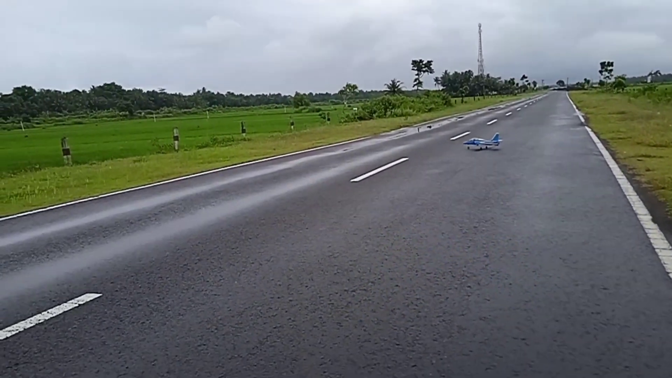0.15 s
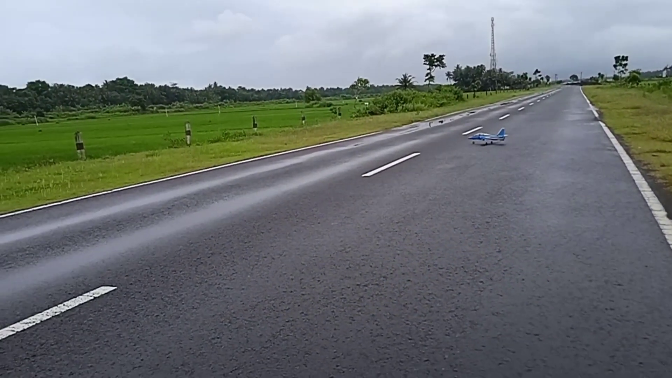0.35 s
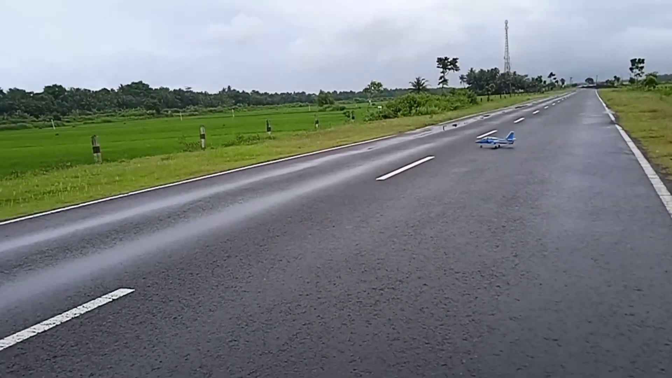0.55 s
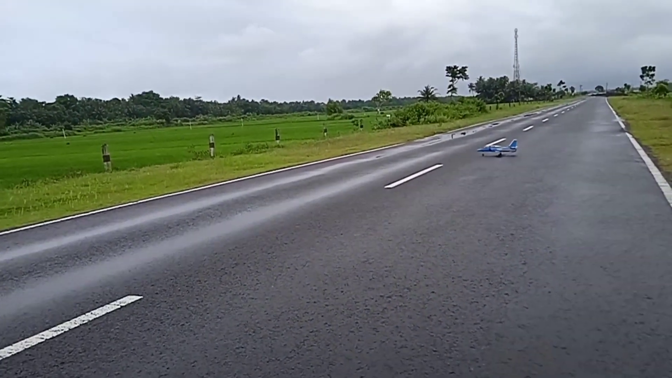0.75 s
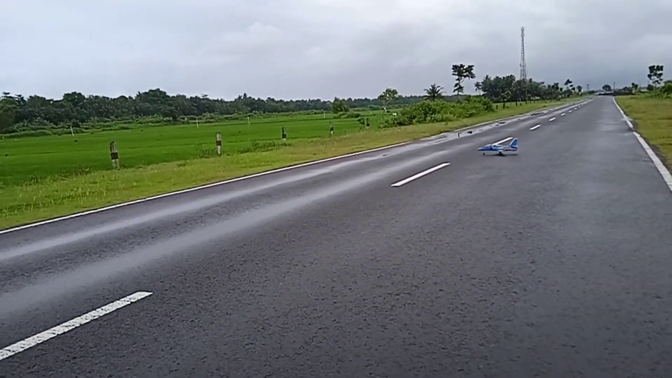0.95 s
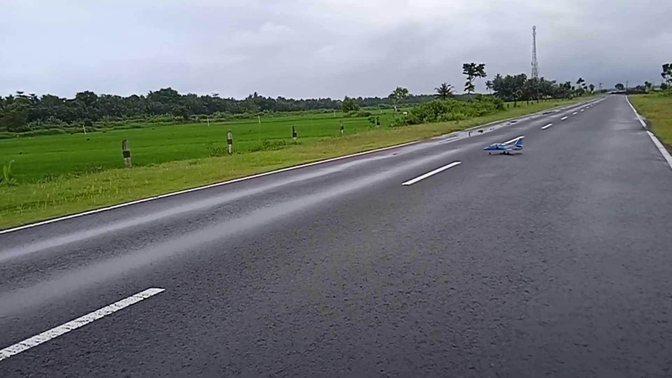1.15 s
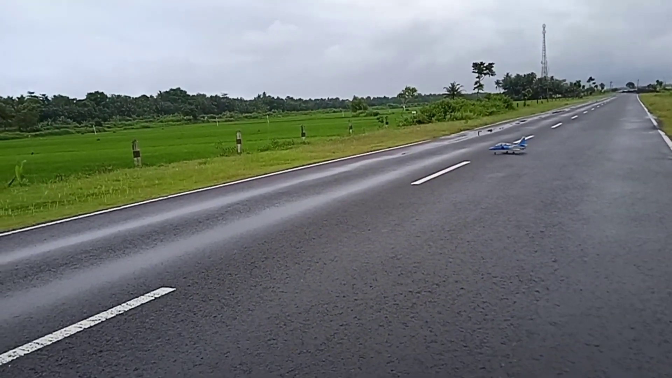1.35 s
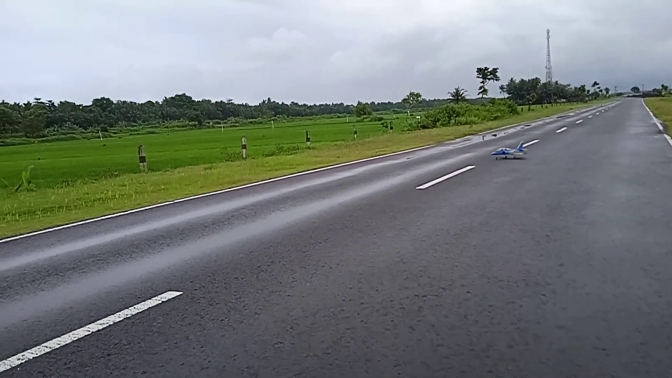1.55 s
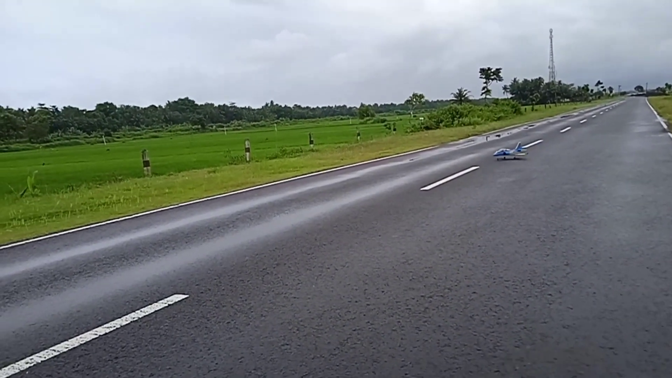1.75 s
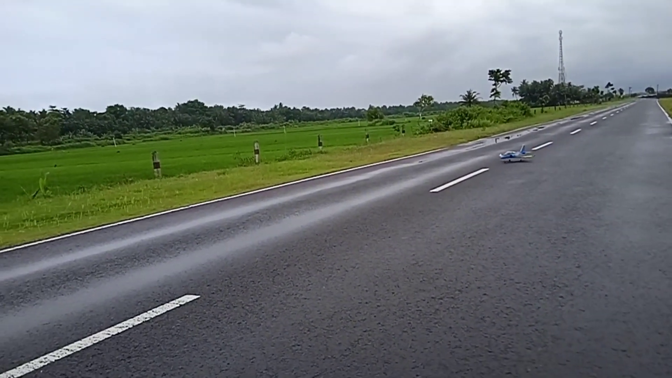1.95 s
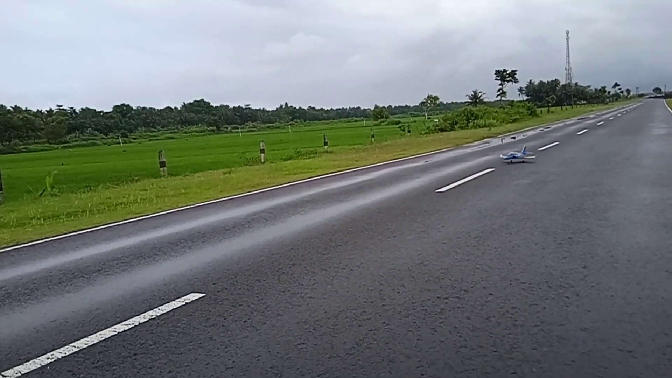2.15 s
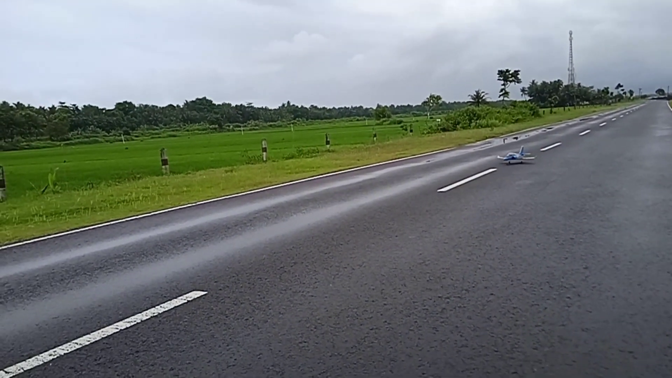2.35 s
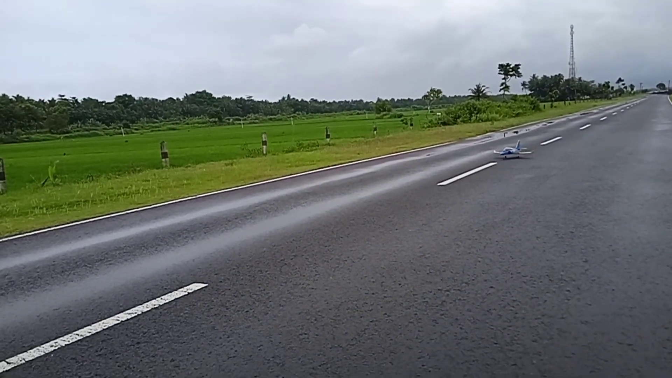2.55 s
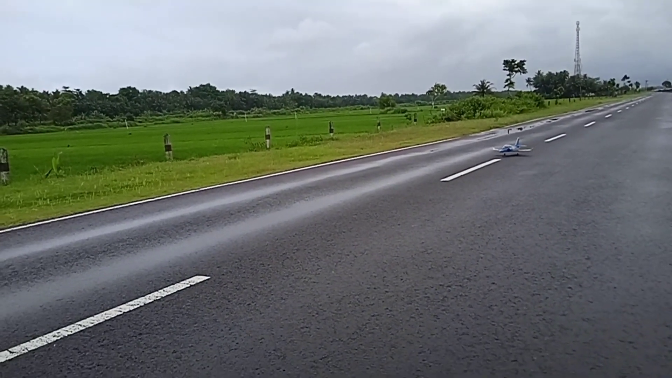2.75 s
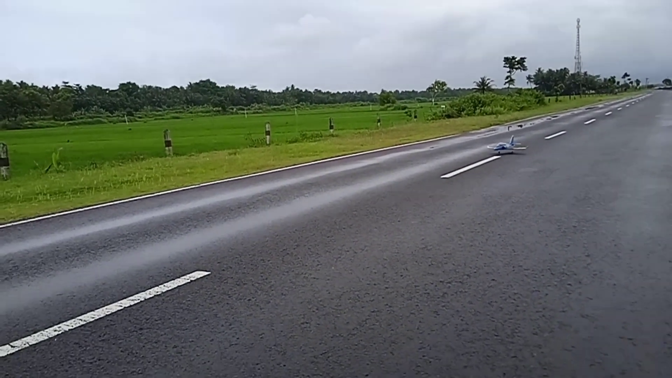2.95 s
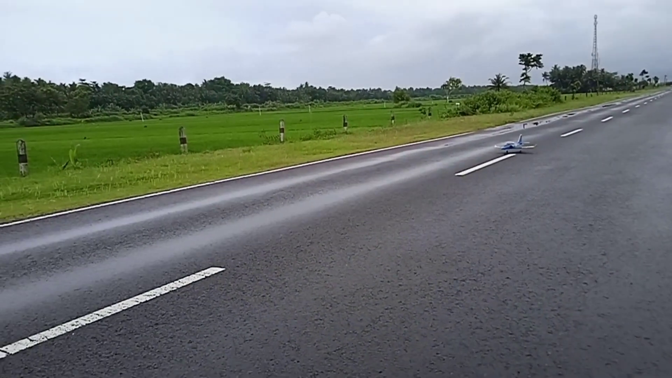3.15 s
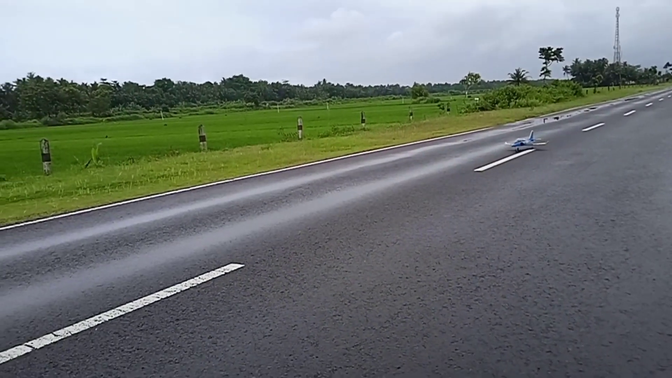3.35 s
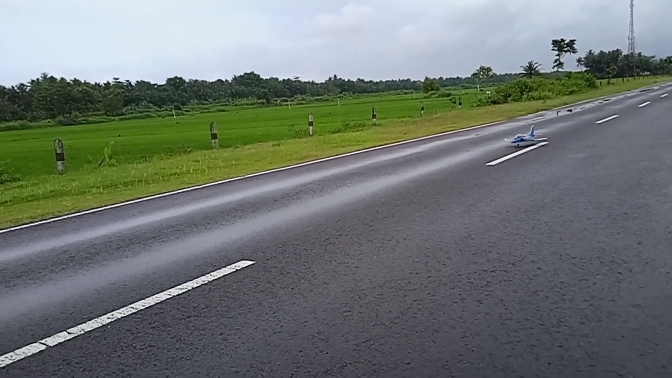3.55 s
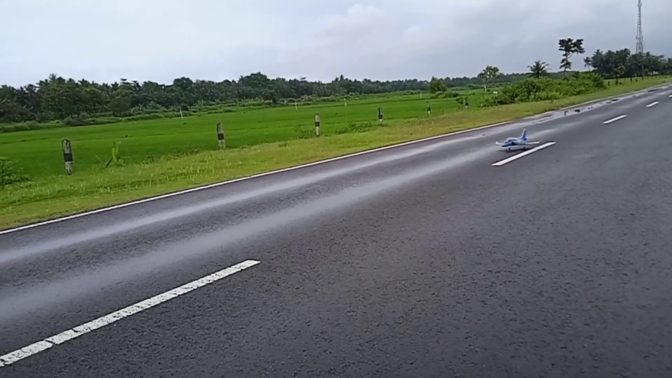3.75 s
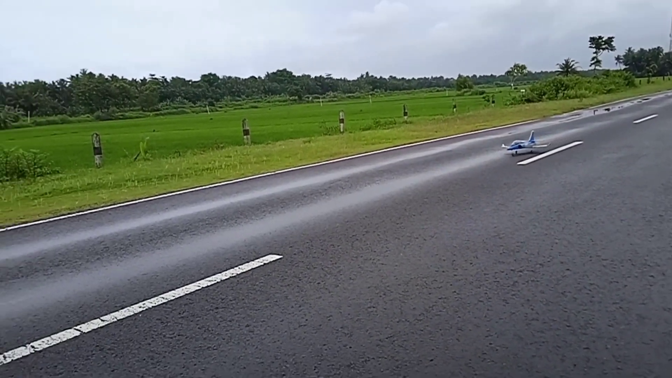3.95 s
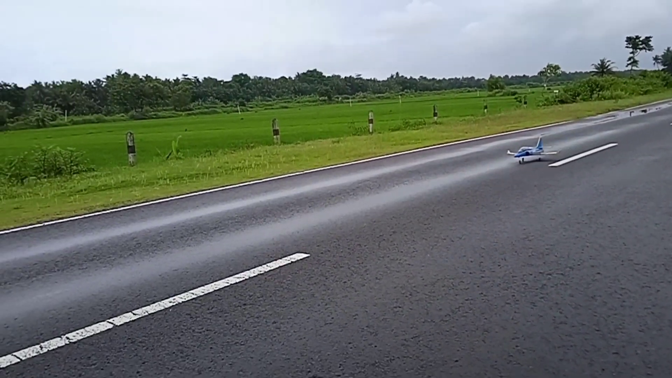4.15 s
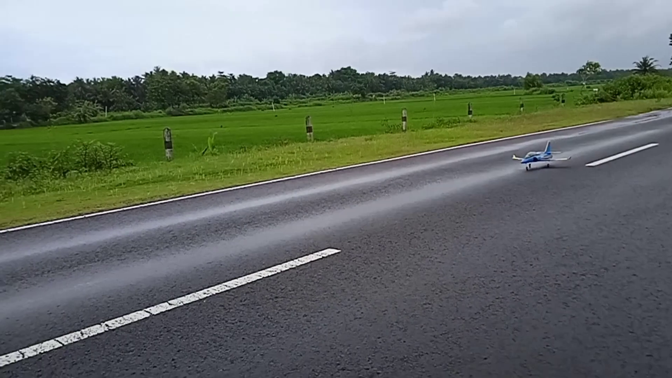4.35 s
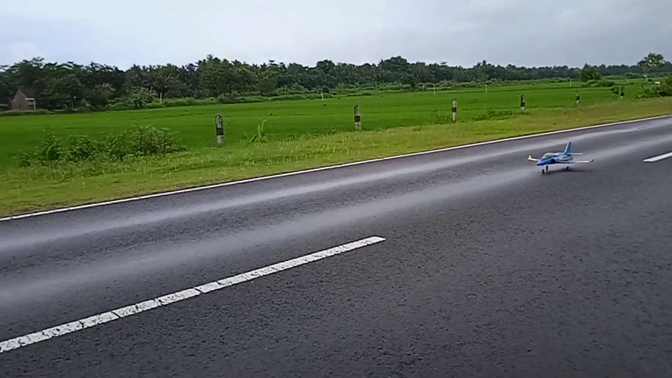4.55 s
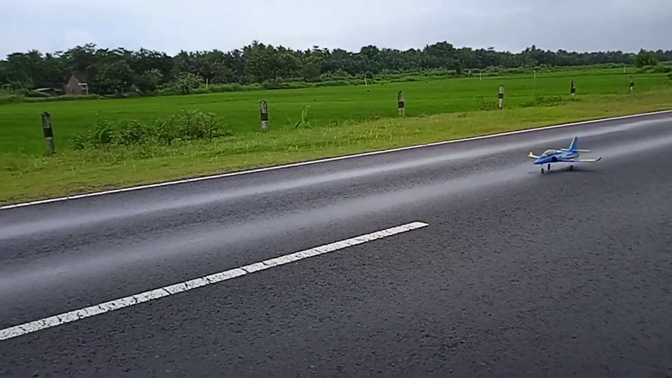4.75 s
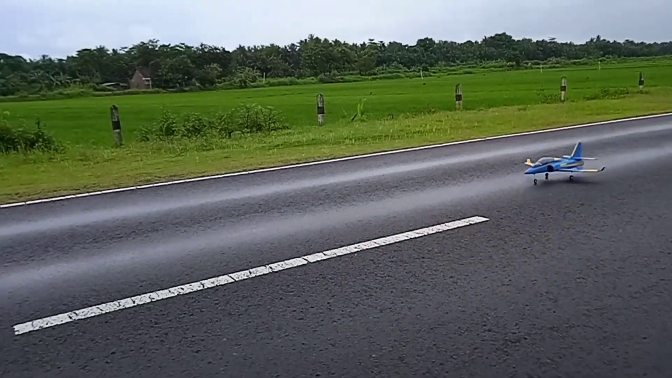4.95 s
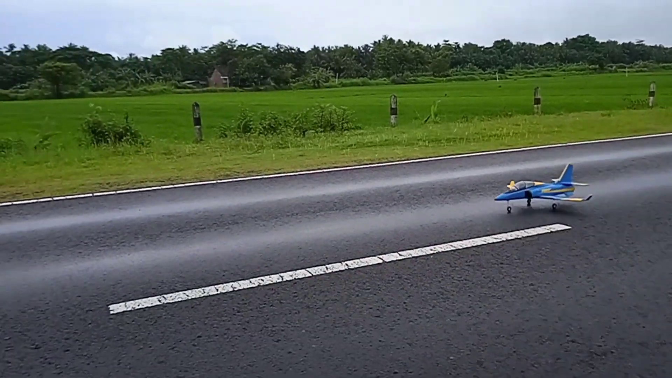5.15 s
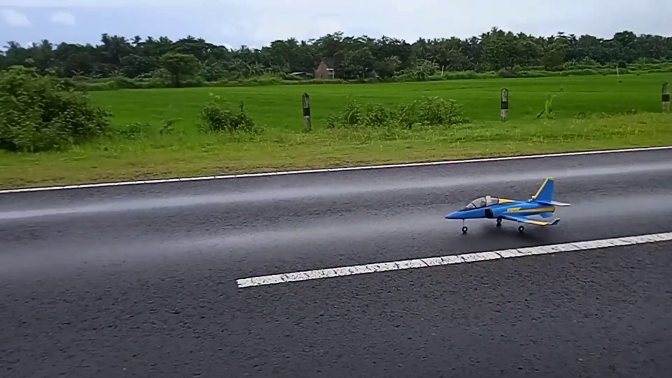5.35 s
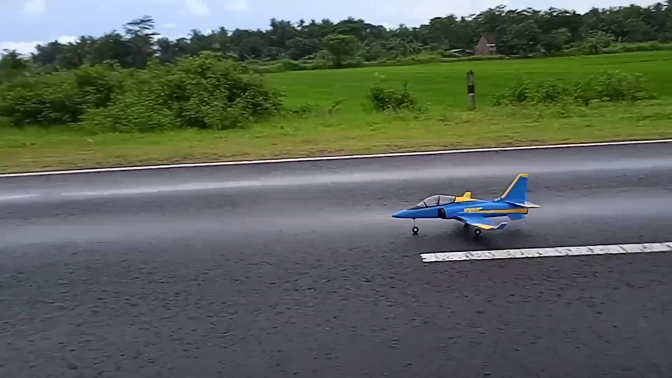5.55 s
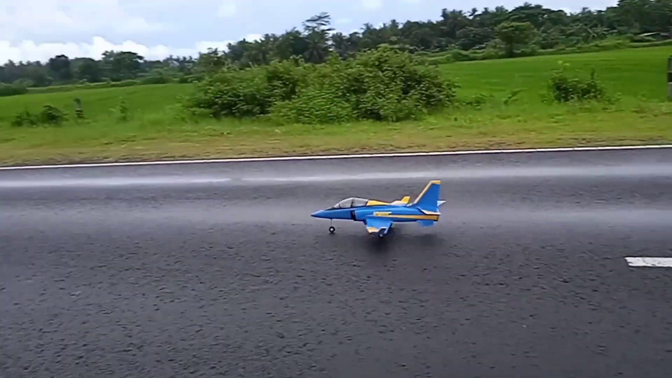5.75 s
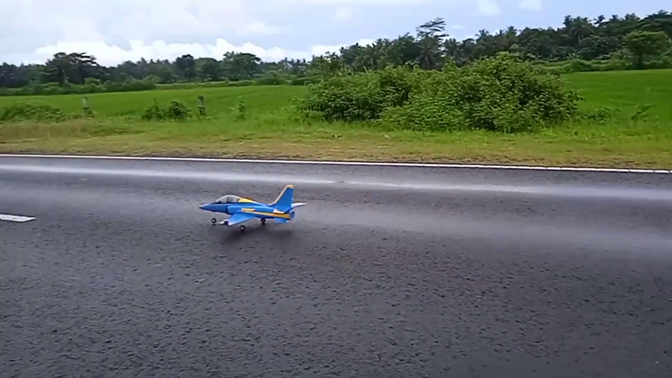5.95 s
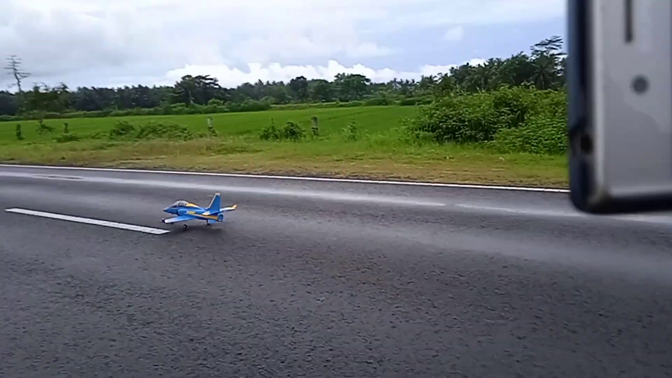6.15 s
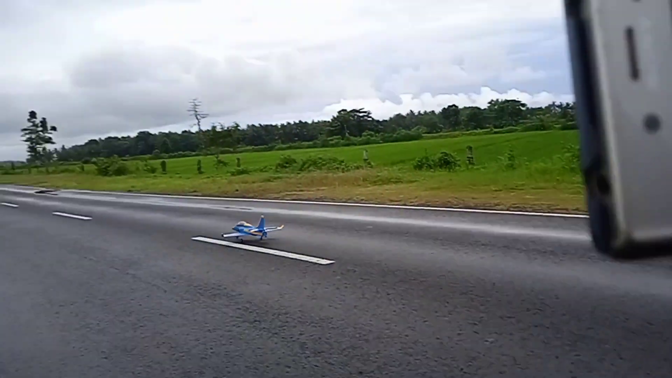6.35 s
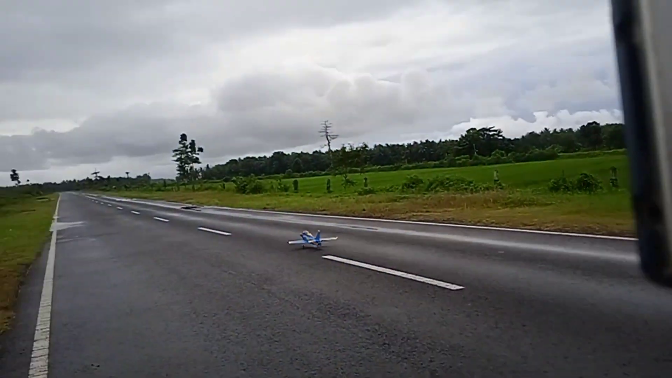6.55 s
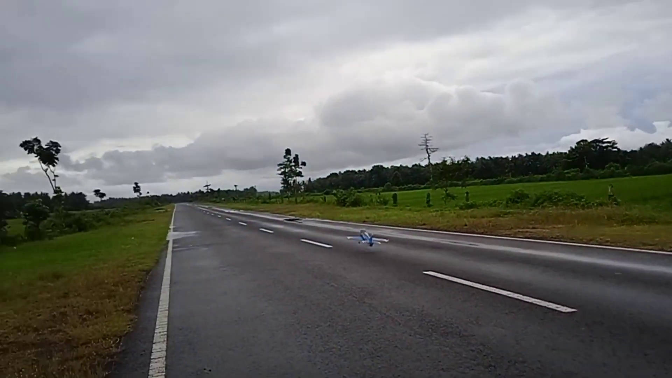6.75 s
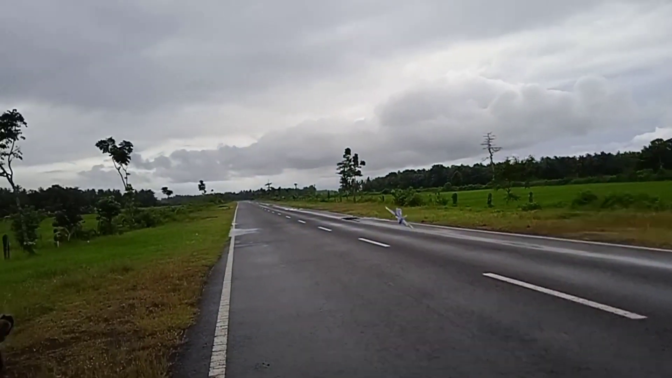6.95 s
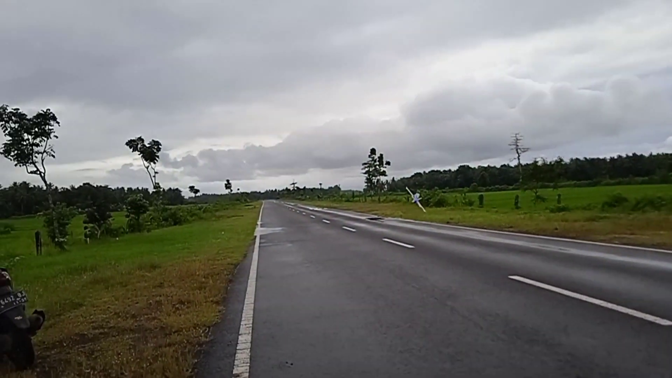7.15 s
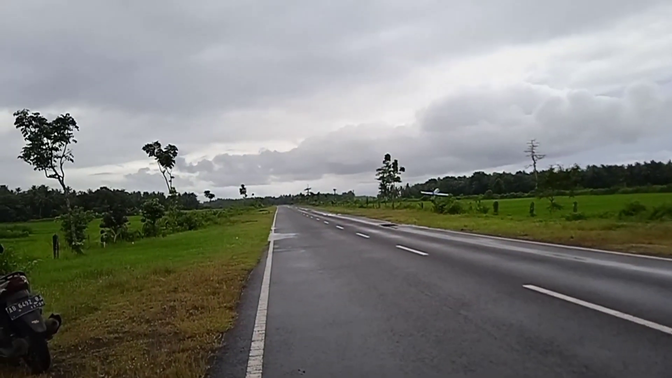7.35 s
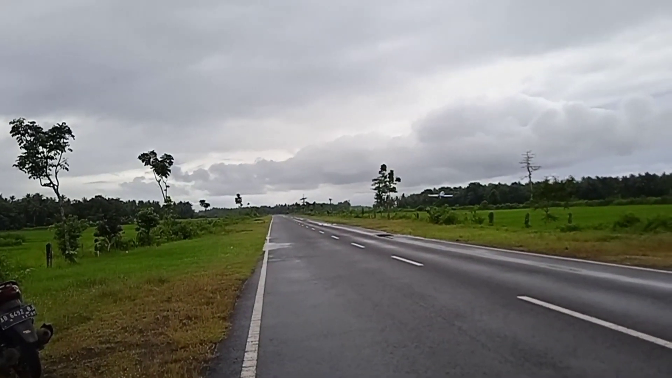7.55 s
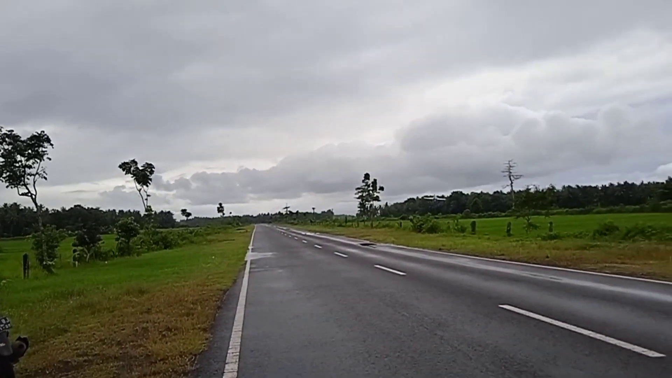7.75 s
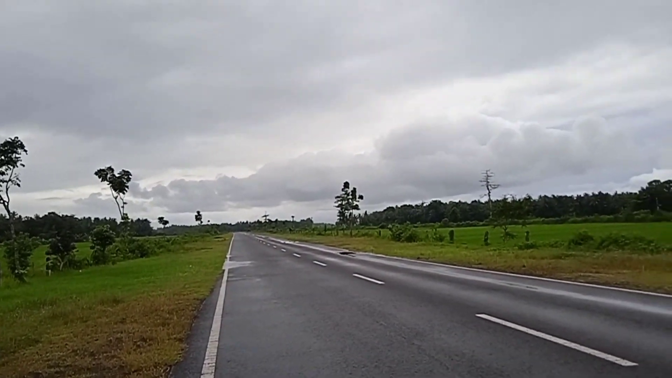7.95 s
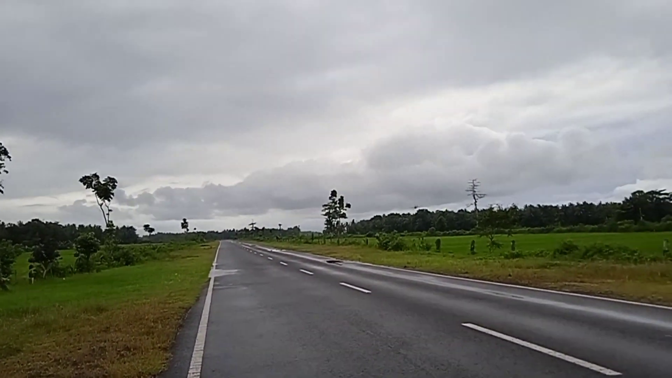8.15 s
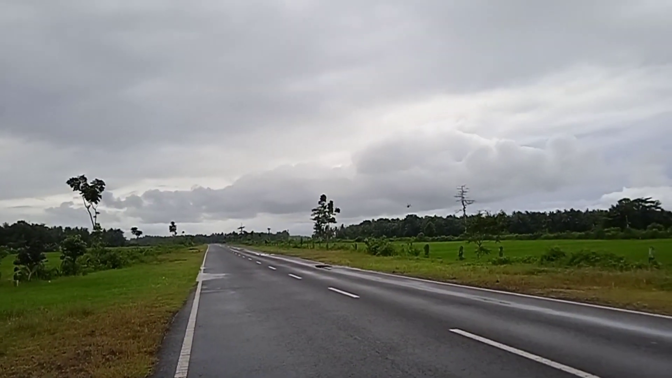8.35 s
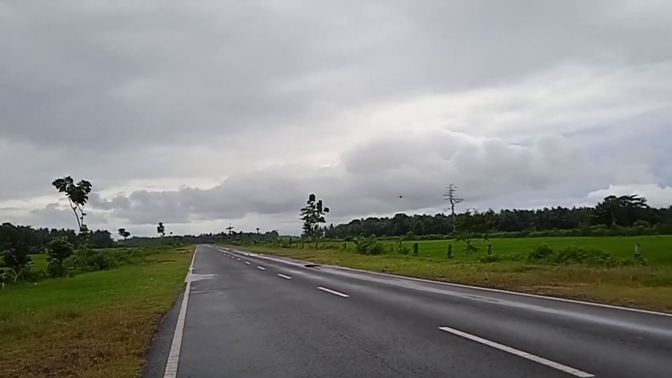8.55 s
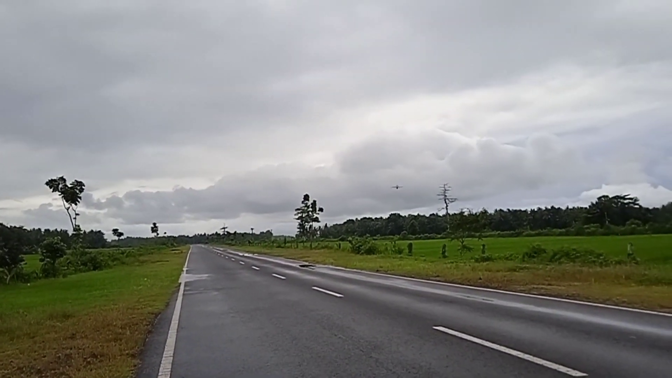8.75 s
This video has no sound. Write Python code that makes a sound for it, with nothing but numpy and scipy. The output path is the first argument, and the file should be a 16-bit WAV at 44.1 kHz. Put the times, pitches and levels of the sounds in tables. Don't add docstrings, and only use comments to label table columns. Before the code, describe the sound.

Outdoors on an open country road, a handheld microphone picks up finger ticks, soft hiss, light wind and a far bird peeping. A small electric ducted fan spools up in steps, its thin whine growing into bright whine and roar. It rushes past a few metres away with a little wheel drumming, drops in pitch, then a sharp knock hits the microphone's case. The jet lifts off and fades into airy hiss.

```python
import sys
import numpy as np
from scipy import signal
from scipy.io import wavfile
from scipy.ndimage import uniform_filter1d, map_coordinates

SR = 44100
rng = np.random.default_rng(int(sys.argv[2]) if len(sys.argv) > 2 else 0)


def how_loud(loudness_db):
    steps = np.asarray(loudness_db, float) / 20
    return 10 ** steps


def wrap_up_sound(samples):
    columns = np.atleast_2d(samples).T
    tamed = np.clip(columns, -1, 1)
    steps = np.round(tamed * 32767).astype(np.int16)
    wavfile.write(sys.argv[1], SR, steps)


N = 388080
TIME = np.arange(N) / SR
SOUND_M_PER_S = 343
BLADES = 11


def evened(x):
    return x / np.sqrt(np.mean(x ** 2) + 1e-20)


def curve(rows):
    s, *columns = np.transpose(rows)
    return [np.interp(TIME, s, column) for column in columns]


def add(mix, s, sound):
    part = mix[round(s * SR):][:len(sound)]
    part += sound[:len(part)]


def drift(rate_hz):
    span = max(int(SR / rate_hz / 2), 1)
    return evened(uniform_filter1d(uniform_filter1d(rng.standard_normal(N), span), span))


def resonate(x, hz, *widths_hz):
    turn = np.exp(2j * np.pi * np.cumsum(hz * np.ones(len(x))) / SR)
    for width_hz in widths_hz:
        r = np.exp(-np.pi * width_hz / SR)
        x = 2 * (turn * signal.lfilter([1 - r], [1, -r], x / turn)).real
    return x


def noise(colour, patchy_db, size=512):
    frames, hz = 4 * N // size + 5, np.fft.rfftfreq(size, 1 / SR)
    f, level_db = np.transpose(colour)
    a, b, patches = rng.standard_normal((frames, len(hz), 3)).T
    patches = uniform_filter1d(patches, size=3, axis=0)
    patches = evened(uniform_filter1d(patches, size=40, axis=1))
    shape_db = np.interp(np.log(hz + 1), np.log(f), level_db, -90, -90)
    z = (a + 1j * b) * how_loud(shape_db[:, None] + patchy_db * patches)
    return evened(signal.istft(z, nperseg=size, noverlap=3 * size // 4)[1][:N])


def echoed(x, ms, strength, dull_hz):
    strength = np.clip(strength, -1, 1)
    low = signal.filtfilt(*signal.butter(1, dull_hz, fs=SR), x)
    delay = uniform_filter1d(ms, size=1000) * SR / 1000
    late = map_coordinates(low, [np.arange(N) - delay], order=1)
    return (x + strength * late) / np.sqrt(1 + strength ** 2)


def tone(turns, db, waver_db, rate_hz):
    level = np.sqrt(2) * how_loud(db + waver_db * drift(rate_hz))
    return level * np.sin(2 * np.pi * (turns + rng.random()))


# middle in seconds, rise time in seconds, change of shaft speed in Hz.
THROTTLE = [(0.099, 0.065, -26.0), (.41, 0.029, 65), (0.579, 0.052, 69.5), (0.724, 0.038, 17),
            (1.25, 0.068, -13), (1.611, 0.078, 21.0), (2.705, 0.027, 61), (2.8, 0.048, 33.5),
            (3.229, 0.081, 52.5), (3.426, 0.04, 45), (3.722, 0.028, 7.5), (3.971, 0.025, 54.5),
            (4.63, 0.026, 25.5), (4.758, 0.041, 64)]
IDLE_HZ = 307.6
PASS_S, LANE_M = 5.777, 5.63
PASS_M_PER_S, GAIN_M_PER_S2 = 10.09, 2.011


def flight():
    t = np.arange(0, N / SR + .01, .005)
    shaft = IDLE_HZ + sum(hz / (1 + np.exp((s - t) / rise)) for s, rise, hz in THROTTLE)
    speed = np.maximum(PASS_M_PER_S + GAIN_M_PER_S2 * (t - PASS_S), 0)
    along = (speed ** 2 - PASS_M_PER_S ** 2) / (2 * GAIN_M_PER_S2)
    metres = np.hypot(along, LANE_M)
    heard = shaft * (1 - speed * along / metres / SOUND_M_PER_S)
    return curve(np.transpose([t, shaft, heard, metres, along / metres]))


# time in seconds, loudness in dB, brightness in dB.
AIR = [(.3, -86, 12.5), (.89, -72.5, -3), (1.27, -75, -2), (2.05, -70.5, -0.5), (2.64, -72.5, 2.5),
       (2.81, -67, 0), (3.21, -64, -1.5), (3.5, -62.5, -1), (4.7, -57.5, -1), (4.85, -53.5, -1),
       (5.34, -50.5, -3.5), (5.51, -52, -2), (5.67, -46.5, -5.5), (6.1, -51, 5), (6.36, -55, 5),
       (6.9, -60.5, 6.5), (7.28, -62, 1.5), (8.8, -69, -4)]
# level in dB, share of loudness, share of brightness, gain from the front in dB,
# gain after the climb in dB.
LAYERS = [
    (-1.5, 1.01, 0.031, -0.6, -17),
    (-0.94, 1.01, 0.041, 0.5, 1),
    (-0.74, 0.96, 1.01, 0.4, 2.5),
    (-3, 1.37, 1.12, 2, 6),
    (-4, 0.93, 1.07, 2, 1),
]
PIVOT_DB = -58
LIFT_S, CLIMB_S = 6.92, 1.9


def air_db():
    (loud, bright), behind = curve(AIR), flight()[3]
    climbed = np.clip((TIME - LIFT_S) / CLIMB_S, 0, 1) ** 2
    return [PIVOT_DB + db + a * (loud - PIVOT_DB) + b * bright - front_db * behind + up_db * climbed
            for db, a, b, front_db, up_db in LAYERS]


# frequency in Hz, level in dB.
FIELD = [(250, -6.5), (500, -8.5), (900, -11.5), (1300, -15), (2500, -16), (4000, -19), (6500, -18),
         (7600, -21.5), (8600, -34), (9800, -27), (11000, -16.5), (12300, -36), (13800, -34), (15200, -21),
         (15900, -42)]


def field():
    return how_loud(-70.5) * noise(FIELD, 3.7, size=1024)


# time in seconds, level in dB.
WIND = [(0.0, -70), (0.71, -66), (2.28, -69.5), (4.21, -65.5), (5.64, -67.5), (6.84, -61.5), (6.98, -66.5),
        (8.8, -71)]
# frequency in Hz, level in dB.
WIND_COLOUR = [(20, -30), (40, -69), (65, -5), (100, -3.5), (150, -2.5), (220, -7.5), (330, -13.5),
               (500, -23.5)]
# start in seconds, peak in dB, frequency in Hz, length in seconds.
PUFFS = [(0.381, -56, 126, 0.039), (0.544, -50.5, 120, 0.032), (2.548, -57, 153, 0.041),
         (4.123, -43.5, 110, 0.032), (5.07, -44, 107.4, 0.036), (6.465, -40.5, 96.7, 0.031),
         (6.513, -45, 96.4, 0.038), (6.591, -41.5, 114.6, 0.032), (6.712, -39, 109, 0.032),
         (6.857, -40, 99, 0.028), (6.941, -44, 111, 0.035), (7.266, -56, 135.4, 0.033),
         (7.424, -42.5, 117, 0.026), (7.929, -47.5, 82, 0.032), (8.489, -56, 155, 0.043),
         (8.549, -52, 150, 0.056)]


def wind():
    out = how_loud(curve(WIND)[0] + 1.76 * drift(25)) * noise(WIND_COLOUR, 1.0, size=2048)
    for s, db, hz, length in PUFFS:
        t = np.arange(0, length, 1 / SR)
        add(out, s, how_loud(db - 4.5) * np.hanning(len(t)) * np.sin(2 * np.pi * hz * (t - length / 2)))
    return out


def far_hum():
    return how_loud(-75.5) * evened(resonate(rng.standard_normal(N), 154.6, 12))


# multiple of the whistle, plus multiple of the shaft, start in seconds,
# end in seconds, level in dB.
SIDEBANDS = [
    (1, -6, .22, 0.36, -82),
    (1, 12, .36, 0.58, -85),
    (2, -6, .53, .7, -89),
    (2, -6, 1.8, 2.75, -101),
]
WHISTLE_HZ, WHISTLE_HZ_PER_S, WHISTLE_END_S = 8004, 11, 4.3


def controller():
    heard = flight()[1]
    hz = WHISTLE_HZ + WHISTLE_HZ_PER_S * TIME
    out = tone(np.cumsum(hz) / SR, -83.5, 5, 9) * np.clip((WHISTLE_END_S - TIME) / 1.4, 0, 1)
    for whistles, shafts, start, end, side_db in SIDEBANDS:
        gate = np.clip(np.minimum(TIME - start, end - TIME) / .03, 0, 1)
        turns = np.cumsum(whistles * hz + shafts * heard) / SR
        out += gate * tone(turns, side_db, 2.1, 16)
    return out


def shaft_turns():
    return np.cumsum(flight()[1] * (1 + 0.000787 * drift(36.0))) / SR


# multiple of the shaft, idle level in dB, swell time in seconds, swell level in dB.
COGGING = [(1, -78, .41, -71), (1, -99, .46, -70), (1, -99, .52, -72), (2, -82, .42, -90),
           (3, -81, .42, -77), (4, -90, .45, -77), (4, -99, .51, -76), (5, -88, .495, -73),
           (6, -84, .38, -84), (7, -83, .43, -77)]


def cogging(turns):
    out = np.zeros(N)
    for k, idle_db, s, swell_db in COGGING:
        idle = how_loud(idle_db) * np.clip((.5 - TIME) / .15, 0, 1)
        swell = how_loud(swell_db) * np.exp(-((TIME - s) / .045) ** 2)
        out += (idle + swell) * tone(k * turns, -2, 3, 40)
    return out


# multiple of the shaft, level in dB against the duct noise.
FAINT = [(4, -31), (5, -27), (7, -31), (12, -21)]


def faint_shaft(turns):
    body_db, out = air_db()[1], np.zeros(N)
    for k, db in FAINT:
        standing_db = 4 * (TIME < 2.6)
        before_pass_db = -15 * (k > BLADES) * (TIME < PASS_CHANGE_S)
        out += tone(k * turns, body_db + db + standing_db + before_pass_db, 4, 12)
    return out


PASS_CHANGE_S = 5.75
# start in seconds, peak in dB, ring in Hz, width in Hz, t60 in seconds.
TICKS = [(.128, -57, 6000, 3000, .004), (.143, -62, 4500, 3000, .004), (0.1657, -51, 1900, 1500, 0.0055),
         (.1656, -54, 500, 1200, 0.006), (.1654, -58, 5000, 5000, .003), (0.193, -40, 3000, 5000, .004),
         (0.1961, -41.5, 2600, 2000, .005), (.2005, -48, 3800, 3000, .004), (0.205, -45, 1500, 1200, .006),
         (0.2145, -46, 4000, 4000, .004), (0.2207, -43, 2190, 1500, .006), (0.223, -45, 4500, 4000, .004),
         (.275, -49, 4770, 1800, 0.0051), (.363, -45.5, 7060, 1500, 0.0056), (.363, -55, 1700, 600, 0.0093),
         (.363, -52, 15100, 1500, .006), (.363, -55, 4600, 1500, 0.0069), (0.367, -50, 7250, 1200, 0.029),
         (.504, -52, 6770, 2200, 0.0066), (.553, -60, 2600, 2000, .005), (.954, -82, 14640, 1980, 0.0046),
         (2.549, -47.5, 1100, 1400, 0.013), (2.957, -46, 2500, 3500, 0.005),
         (8.4497, -51, 3300, 2000, 0.0024), (8.4495, -43, 7100, 3000, .003)]
KNOCK = [
    (6.2786, -37, 1500, 1800, .008),
    (6.283, -35, 1900, 1400, .008),
    (6.2875, -39, 2400, 1600, .006),
    (6.2912, -38, 1700, 1400, .006),
    (6.2957, -26.5, 1350, 1500, .006),
    (6.301, -37, 1950, 1200, .01),
    (6.305, -36, 900, 800, .01),
    (6.3072, -39, 1600, 1200, .01),
    (6.3105, -40, 850, 600, .012),
]
# start in seconds, length in seconds, rms in dB, centre in Hz, width in Hz.
RASPS = [(0.188, 0.0433, -59.5, 2200, 1400), (.195, 0.035, -61, 1430, 700), (.187, .013, -61.5, 900, 600),
         (0.189, 0.037, -61.5, 6100, 3200), (0.232, 0.013, -65, 4100, 6200),
         (6.278, 0.037, -47, 1800, 1200), (6.276, 0.057, -51, 920, 590), (2.54, 0.025, -61, 750, 1200)]


def handling():
    out, t = np.zeros(N), np.arange(1500) / SR
    for s, db, hz, width_hz, t60 in TICKS + KNOCK:
        strike = 12 * (t == 0)
        burst = how_loud(-60 * t / t60) * (rng.standard_normal(len(t)) - strike)
        tick = resonate(burst, hz, width_hz, width_hz, width_hz)
        add(out, s, how_loud(db) * tick / abs(tick).max())
    for s, length, db, hz, width_hz in RASPS:
        scrape, chance, size = rng.random((round(length * SR), 3)).T
        grit = (scrape - .5) * (0.25 + (chance < .08) * how_loud(10 * size))
        rasp = resonate(grit, hz, width_hz, width_hz, 2 * width_hz)
        add(out, s, how_loud(db) * evened(rasp) * signal.windows.tukey(len(rasp), .2))
    return out


# frequency in Hz, level in dB.
ROAR = [(400, -24), (520, -4), (620, 4), (780, 3.5), (950, -0.5), (1060, -14.5), (1300, -2)]
BODY = [(1050, -34), (1260, 4), (1450, -12), (1780, -2.5), (2030, -2), (2200, -5.5), (2550, -6.5),
        (2800, -5), (3300, -4.5), (3750, -8.5), (4250, -12.5), (4900, -9)]
HISS = [(3800, 1.5), (4800, 3.5), (5800, 7.5), (6800, 10), (7800, 6.5), (9000, -20), (10500, -44)]
FIZZ = [(8500, -24), (9800, -14.5), (11500, -18.5), (12800, -20.5), (13800, -20), (14300, -11),
        (14800, -8.5), (15500, 0.5), (16000, -13)]
# time in seconds, frequency in Hz, dB against the roar.
BOOM = [(.5, 860, 4), (1.3, 867, -1), (1.7, 887, 3), (3.5, 866, -4), (4.5, 1010, -0.5), (5.2, 860, 0.5),
        (5.5, 716, -10), (5.95, 639, 1), (6.4, 790, -11)]
BOOM_WIDENS_S = (1.43, 2.3)
# time in seconds, height of the duct in metres, strength 0-1.
ROAD = [(5.3, .11, .1), (5.8, .126, .65), (6.0, .116, .92), (6.2, .118, .92), (6.4, .1, .75),
        (6.6, .1, .45), (6.88, .13, .75), (7.0, .27, .85), (7.1, .445, .82), (7.2, .72, .8),
        (7.3, .975, .8), (7.4, 1.17, .8), (7.6, 1.5, .8), (7.8, 1.79, .76), (8.0, 2.03, .78),
        (8.5, 2.94, .85), (8.8, 3.85, .85)]
# time in seconds, delay in ms, strength 0-1.
CASE = [(.3, 0.2, 0.44), (2.3, 0.2, 0.68), (3, .18, 0.58), (3.8, 0.19, 0.28), (5.25, 0.14, 0.54),
        (5.7, 0.17, 0.12), (6, 0.11, 0), (7.2, .25, 0.1), (7.7, .25, 0.14), (8.8, 0.26, 0.19)]
WRIST = [(.3, 0.67, 0.5), (1.5, 0.707, 0.33), (2.8, 0.74, 0.16), (4.1, 0.73, 0.23), (5, .66, 0.07),
         (6.2, 0.8, 0.07), (6.8, 0.48, 0)]
HOLDER = [(.3, 1.16, 0.3), (1.65, 1.4, .35), (2.5, 1.38, 0.36), (3.5, 1.24, 0.4), (4.3, 1.15, 0.26),
          (5.1, 1.21, 0.28), (5.55, 1.2, .45), (5.9, 1.2, 0.24), (6.28, 1.36, .15), (6.36, 1.31, .35),
          (6.65, 1.52, 0.4), (7.3, 1.55, 0.05), (7.9, 1.56, 0.1), (8.8, 1.7, 0.18)]
CHEST = [(.3, 2.7, 0.2), (1.65, 1.74, 0.26), (2.1, 2.7, 0.07), (3.15, 1.57, 0.1), (3.75, 2.4, 0.09),
         (4.95, 2.07, 0.12), (6.25, 1.54, 0.05), (6.36, 1.72, 0.13), (6.75, 1.73, .25), (7.05, 1.8, 0.18),
         (7.35, 1.9, .25), (7.6, 1.6, 0.25), (8.8, 1.86, 0.1)]
# time in seconds, delay after the holder's in ms, strength 0-1.
EDGE = [(.3, .1, 0.1), (1.5, 0.067, 0), (2.2, 0.054, 0.18), (3.5, 0.059, 0.13), (4.4, 0.15, 0.01),
        (5.5, 0.11, 0.24), (6.1, 0.27, 0.02), (6.75, 0.093, 0.38), (7.3, 0.09, 0.26), (8.8, 0.093, 0)]
CAMERA_M = 1.3


def air():
    levels_db, (_, heard, metres, _) = air_db(), flight()
    kinds = zip(levels_db, (ROAR, BODY, HISS, FIZZ), (1.4, 1.9, 1.7, 1.5))
    flow = sum(how_loud(db) * noise(colour, patchy_db) for db, colour, patchy_db in kinds)
    boom_hz, boom_db = curve(BOOM)
    narrow, wide = (evened(resonate(rng.standard_normal(N), boom_hz, w, w)) for w in (100, 270))
    share = np.interp(TIME, BOOM_WIDENS_S, (0, .9))
    flow += how_loud(levels_db[0] + boom_db) * (np.sqrt(1 - share) * narrow + np.sqrt(share) * wide)
    hump = resonate(rng.standard_normal(N), BLADES * heard, 1500, 1500)
    flow += how_loud(levels_db[4]) * evened(hump)
    flow *= how_loud(0.78 * drift(25.0)) * np.clip((TIME - .3) / 0.27, 0, 1)
    height, strength = curve(ROAD)
    road_ms = 2000 * height * CAMERA_M / metres / SOUND_M_PER_S
    flow = echoed(flow, road_ms, strength, 8000)
    for rows, dull_hz in ((CASE, 9000), (WRIST, 7000), (HOLDER, 7500), (CHEST, 6000)):
        flow = echoed(flow, *curve(rows), dull_hz)
    extra, strength = curve(EDGE)
    return echoed(flow, curve(HOLDER)[0] + extra, -strength, 7500)


# middle in seconds, half length in seconds,
# level in dB.
LOBES = [(0.544, 0.066, -77), (.7, .08, -68), (0.87, 0.045, -68), (1.03, 0.091, -69.5), (1.3, 0.036, -70),
         (1.404, 0.057, -73), (1.498, .04, -71), (1.65, 0.063, -69), (1.759, .05, -69.5),
         (1.971, 0.17, -67.5), (2.452, 0.12, -80), (2.882, 0.17, -59), (3.2, 0.16, -57.5),
         (3.512, 0.15, -59.5), (3.717, 0.088, -67), (3.97, 0.074, -57.5), (4.412, 0.34, -53),
         (4.707, 0.018, -65), (4.785, 0.025, -65), (4.928, 0.095, -63), (5.286, 0.042, -48.5),
         (5.482, .06, -59), (5.592, .035, -54), (5.669, 0.016, -47), (5.733, 0.013, -56), (5.79, .03, -58),
         (5.873, .025, -57), (6.002, 0.027, -63), (6.321, 0.17, -37.5), (6.785, 0.11, -48),
         (6.974, 0.074, -47), (7.11, 0.04, -48.5), (7.235, 0.064, -52.5), (7.449, 0.21, -63),
         (7.897, 0.21, -77.5), (8.297, 0.27, -71), (8.747, 0.11, -69.5)]
# frequency in Hz, level in dB.
OCTAVE = [(6500, -82), (7500, -86), (8800, -87), (9700, -92), (10500, -100), (12800, -95), (14100, -67.5),
          (15300, -76)]


def blades(turns):
    between = how_loud(air_db()[1] - 18.5)
    beam = between + sum(how_loud(db) * np.exp(-((TIME - s) / half) ** 2) for s, half, db in LOBES)
    waver_db = 1.5 + .7 * (TIME < 2.7) - .9 * (TIME > 6.05)
    out = beam * tone(BLADES * turns, 0, waver_db, 14) * (TIME > .3)
    f, db = np.transpose(OCTAVE)
    octave_db = np.interp(2 * BLADES * flight()[1], f, db, -120, -120)
    return out + tone(2 * BLADES * turns, octave_db, 4, 10)


# start in seconds, length in seconds, from Hz, to Hz, level in dB.
CHIRPS = [(.445, 0.065, 2850, 2470, -80), (0.61, .03, 3250, 3300, -79), (.65, .035, 3000, 3350, -77),
          (.96, .03, 3000, 3220, -79), (1.212, .035, 3000, 3300, -77), (1.43, 0.065, 2890, 2410, -76),
          (2.362, 0.066, 2930, 2460, -76), (2.68, 0.0495, 3250, 3400, -73), (3.292, 0.037, 2880, 2890, -74),
          (3.5, .04, 2480, 2380, -68), (3.56, 0.034, 2420, 2380, -71)]


def bird():
    out = np.zeros(N)
    for s, length, from_hz, to_hz, db in CHIRPS:
        hz = np.linspace(from_hz, to_hz, round(length * SR))
        chirp = np.hanning(len(hz)) ** .5 * np.sin(2 * np.pi * np.cumsum(hz) / SR)
        add(out, s, how_loud(db + 5.0) * chirp)
    return out


DUCT_S = (0.619, .75, 1.4, 1.6)
DUCT_HZ = 908


def singing_duct():
    breath = evened(resonate(rng.standard_normal(N), DUCT_HZ, 6.2))
    clean = tone(np.cumsum(DUCT_HZ + 5.2 * drift(6.2)) / SR, 0, 2.0, 15)
    return how_loud(-72) * (.45 * breath + clean) * np.interp(TIME, DUCT_S, (0, 1, 1, 0))


# frequency in Hz, width in Hz, level at the pass in dB.
SHELL = [(455, 82, -57.5), (578, 116, -47), (585, 34, -44), (610.5, 30, -38), (657, 40, -54),
         (707, 50, -55), (790, 18.1, -52.5), (860, 33, -60), (1124, 71, -50), (1240, 100, -58),
         (1367, 194, -52), (1560, 300, -59), (2415, 290, -63.5), (2775, 250, -60), (3147, 650, -59),
         (4070, 250, -62.5), (4750, 180, -66.5)]
# multiple of the shaft, level in dB, twinkle in dB, change from behind in dB.
ORDERS = [
    (1, -0.5, 1.45, -23.5),
    (2, -11, 4.5, -11),
    (3, -0.5, 0.7, -49),
    (6, -5, 4, -2),
]
BEHIND_FROM = 0.72
HATCH_S, HATCH_DROP_DB = 3.525, -4


def shell(turns):
    shaft, _, metres, behind = flight()
    shade = np.clip((behind - BEHIND_FROM) / (1 - BEHIND_FROM), 0, 1)
    full_power = TIME > 4.7
    hatch_db = HATCH_DROP_DB * np.interp(TIME - HATCH_S, (0, .02, .3, .5), (0, 1, 1, 0))
    out = np.zeros(N)
    for k, db, waver_db, behind_db in ORDERS:
        power = sum((how_loud(peak_db) / (1 + (2 * (k * shaft - hz) / width) ** 4)) ** 2
                    for hz, width, peak_db in SHELL)
        level_db = db + behind_db * shade - 2 * full_power + (k == 1) * hatch_db
        sound = tone(k * turns, level_db, waver_db + 3.5 * full_power, 16.3)
        out += np.sqrt(power) * LANE_M / metres * sound * np.clip((TIME - .62) / .03, 0, 1)
    return out


# middle in seconds, half length in seconds, from Hz, to Hz, level in dB.
SWELLS = [(1.74, 0.16, 2150, 2400, -76.5), (3.007, 0.37, 6170, 6050, -62.5), (3.949, 0.49, 1174, 1232, -66),
          (5.354, 0.24, 1930, 2000, -57), (5.75, 0.081, 4300, 4600, -63), (5.901, 0.1, 4840, 5200, -56),
          (6.05, 0.13, 5100, 6320, -58), (6.551, .2, 1430, 1370, -56), (6.6, .15, 3380, 3700, -64.5),
          (6.621, .2, 1890, 1820, -60), (7.549, 0.14, 3920, 3700, -67.5), (5.85, .15, 272, 250, -56.5),
          (5.4, .15, 560, 566, -57), (6.1, .12, 560, 553, -55), (5.85, 0.11, 2300, 2240, -63),
          (6.6, 0.14, 1040, 1000, -61.5), (5.62, .1, 1050, 966, -60), (5.95, .1, 11600, 13300, -65),
          (6.12, .12, 766, 734, -54.5), (5.85, .12, 200, 205, -58.5), (4.63, .12, 790, 795, -70),
          (5.6, .1, 2280, 2400, -66), (.97, 0.043, 880, 880, -66), (6.58, .08, 15000, 15000, -59.5),
          (8.05, .5, 2090, 1980, -73), (5.12, .12, 1540, 1590, -61), (5.6, .1, 200, 200, -62.5),
          (5.55, .12, 5060, 5200, -64), (6.38, .07, 7300, 7400, -60), (5.12, .08, 6800, 6900, -59),
          (5.9, 0.09, 7100, 7000, -53), (1.0, .3, 1797, 1800, -79), (2.2, 0.31, 3200, 3180, -78)]


def swells():
    out = np.zeros(N)
    for s, half, from_hz, to_hz, db in SWELLS:
        u = np.linspace(-2, 2, round(4 * half * SR))
        hz, width = from_hz + (to_hz - from_hz) * (u + 1) / 2, 0.094 * from_hz
        band = resonate(rng.standard_normal(len(u)), hz, width, width)
        add(out, s - 2 * half, how_loud(db) * np.exp(-u ** 2) * evened(band))
    return out


# frequency in Hz, level in dB.
WHEEL_COLOUR = [(150, 4.5), (210, -3.5), (320, 7.5), (400, -6.5), (480, -2.5)]


def wheels():
    _, _, metres, behind = flight()
    level_db = -51.5 - 3.0 * (metres - LANE_M) - 2 * behind
    return how_loud(level_db) * noise(WHEEL_COLOUR, 1.5, size=1024)


def scene():
    turns = shaft_turns()
    around = field() + wind() + far_hum() + handling() + bird()
    rotor = cogging(turns) + faint_shaft(turns) + blades(turns) + shell(turns)
    jet = controller() + rotor + air() + singing_duct() + swells() + wheels()
    return (around + jet)[None]


def top_cut(x):
    return signal.sosfilt(signal.butter(12, 16440, fs=SR, output="sos"), x)


def record(dry):
    edge = signal.firwin(1001, 15460, window=("kaiser", 9), fs=SR)
    return top_cut(signal.oaconvolve(dry, edge[None], "same"))


dry = scene()
out = record(dry)
wrap_up_sound(out)
```